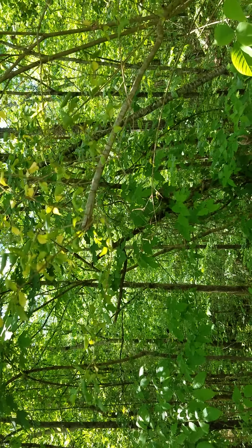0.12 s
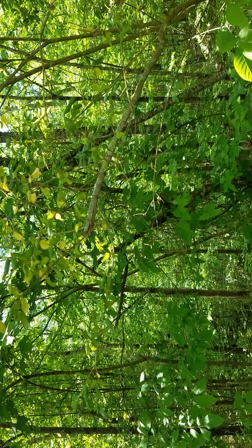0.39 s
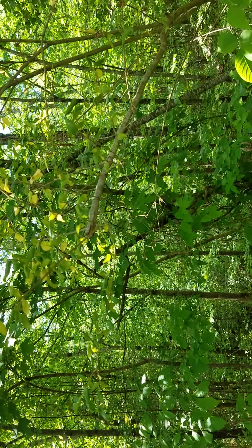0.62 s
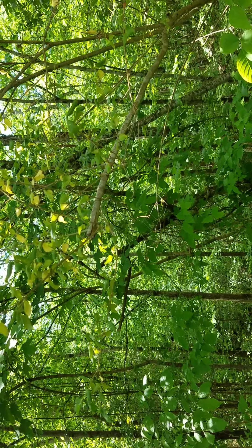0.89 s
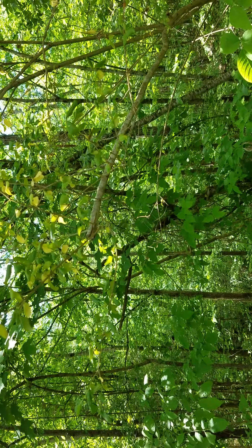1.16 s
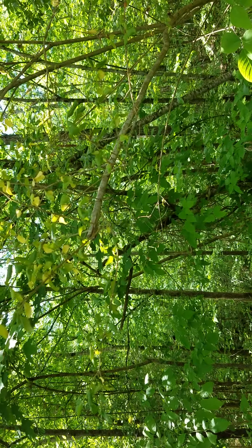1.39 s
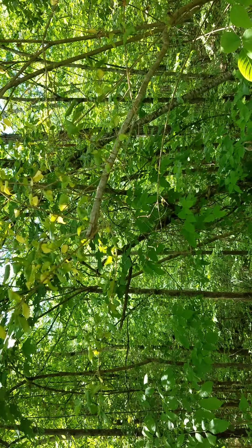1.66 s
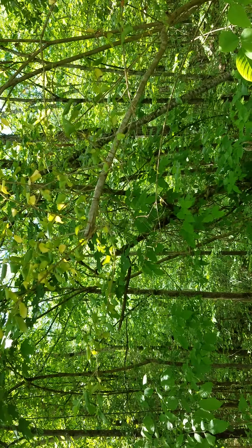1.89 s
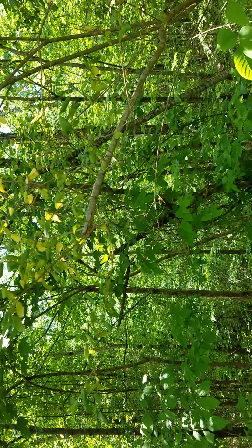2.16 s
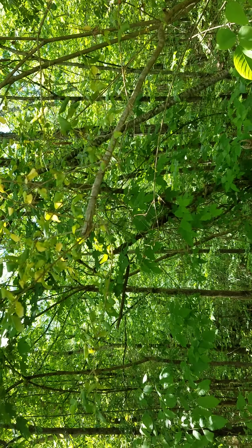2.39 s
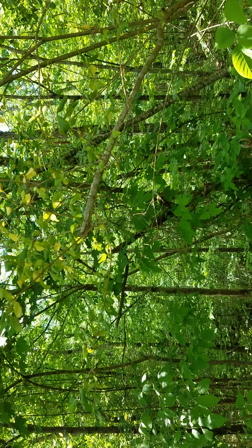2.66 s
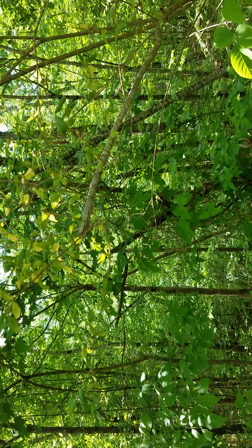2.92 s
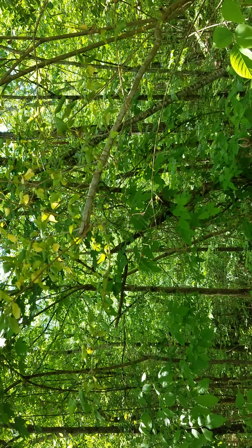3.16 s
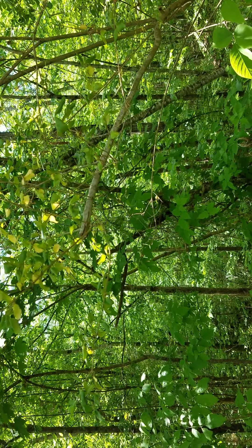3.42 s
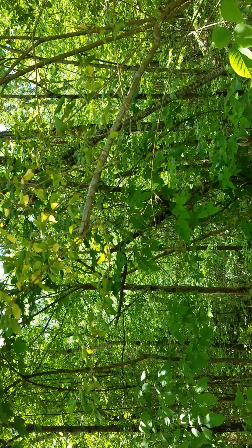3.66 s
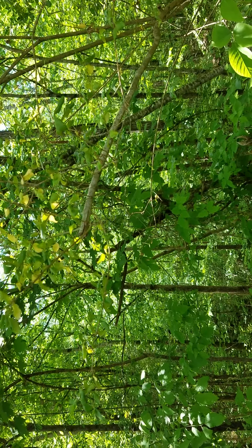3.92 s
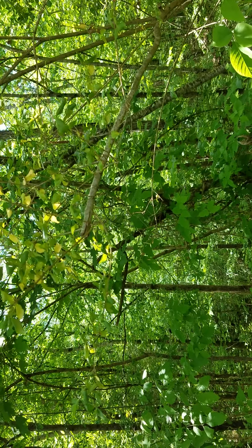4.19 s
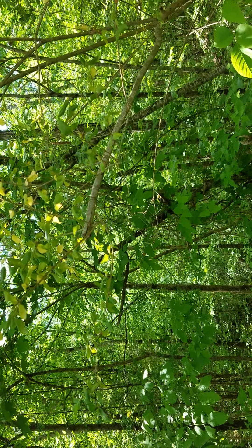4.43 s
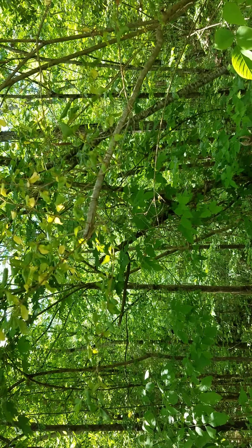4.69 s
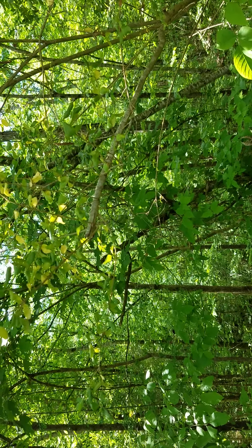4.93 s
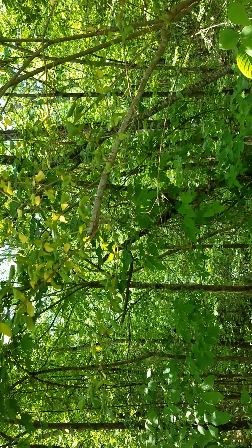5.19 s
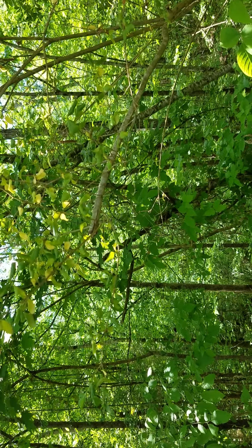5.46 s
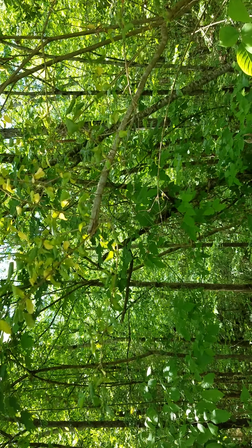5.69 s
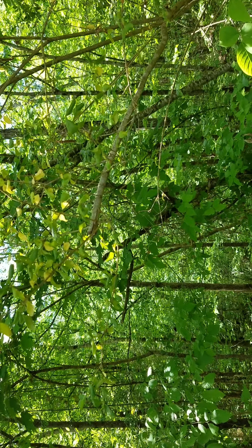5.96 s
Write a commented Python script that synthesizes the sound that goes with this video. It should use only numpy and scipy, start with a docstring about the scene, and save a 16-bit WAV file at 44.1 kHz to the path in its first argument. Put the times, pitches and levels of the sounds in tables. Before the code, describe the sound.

Outdoors among trees, open stereo microphones catch a continuous high sizzling buzz of countless cicadas, grainy and bright, rising over several seconds. Clear, mid-pitched bird whistles repeat through it in two bursts with a pause between, leaving a woodland echo. A very faint distant bird answers midway, near a soft low wind puff. A thin lower insect drone and quiet air sit far beneath.

```python
"""A swelling high buzz of hundreds of cicadas fills a summer wood, over a thin low drone from a farther kind.
A bird repeats two whistled phrases that echo among the trunks, and a second bird answers far off.
Below lies a faint rumble of air with a few wind puffs; dry ticks sound near the end. Two ports set apart hear it all.
The buzz is made of single clicks, the drone and rumble of shaped noise, the birds of gliding sines,
the puffs of brief low waves and the ticks of short bursts of treble noise."""
import sys
import numpy as np
from scipy import signal
from scipy.io import wavfile
from scipy.ndimage import uniform_filter1d

SR = 44100
rng = np.random.default_rng(int(sys.argv[2]) if len(sys.argv) > 2 else 0)


def wrap_up_sound(samples):
    """Save the sound to the file named by the first command line argument, as 16-bit audio."""
    columns = np.atleast_2d(samples).T
    # keep every value between -1 and 1, then stretch to whole-number steps
    tamed = np.clip(columns, -1, 1)
    steps = np.round(tamed * 32767).astype(np.int16)
    wavfile.write(sys.argv[1], SR, steps)


def level_to_linear(level):
    """Convert decibel levels to linear amplitude factors, elementwise."""
    exponent = np.asarray(level, float) / 20
    return 10 ** exponent


N = 268216  # length of the scene in samples

# the whole chorus swells and sinks: (t/s, level/dB)
CHORUS_SWELL = [(0.0, -30), (.6, -30.5), (.92, -28), (1.22, -30), (1.7, -28.5), (2.2, -28), (2.8, -27.5),
                (3.15, -26.5), (3.4, -26.5), (3.65, -24.5), (4.05, -25), (4.6, -22.5), (5.0, -23.5),
                (5.3, -23), (5.6, -24), (6.08, -24.5)]


def evened(x):
    """Scales a sound to an rms of 1."""
    return x / np.sqrt(np.mean(x ** 2) + 1e-20)


def read(points, hz, column=1):
    """Reads a table between its points on a log-frequency axis."""
    table = np.array(points, float)
    return np.interp(np.log(hz + 1), np.log(table[:, 0] + 1), table[:, column])


def curve(rows, t, column=1):
    """Reads a table between its points on the time axis."""
    table = np.array(rows, float)
    return np.interp(t, table[:, 0], table[:, column])


def swell_offset(t):
    """How far the chorus stands above its mean level, in dB."""
    level = curve(CHORUS_SWELL, t)
    return level - level.mean()


def left_right(db):
    """Gains of the two ports for a left-minus-right difference in dB."""
    return level_to_linear(np.array([[db], [-db]]) / 2)


def resonate(x, hz, width):
    """A resonance of gain 1 at its centre, applied twice for steep skirts."""
    turn = np.exp(2j * np.pi * hz * np.arange(x.shape[-1]) / SR)
    r = np.exp(-np.pi * width / SR)
    # turn the centre down to 0 Hz, smooth there, and turn it back up
    smooth = signal.lfilter([(1 - r) ** 2], [1, -2 * r, r * r], x / turn)
    return 2 * (turn * smooth).real


def scatter(t60, size):
    """Echoes off trunks and leaves: dense random taps that fall 60 dB in t60 seconds, others at each port."""
    fade = level_to_linear(-60 * np.arange(size) / SR / t60)
    tail = rng.standard_normal((2, size)) * fade
    return tail / np.linalg.norm(tail, axis=1, keepdims=True)


def pair(size):
    """Noise spectra for two ports, alike in the bass and mostly unrelated higher up."""
    # how alike left and right are: (f/Hz, likeness from -1 to 1)
    likeness = [(60, 0.69), (99, 0.7), (160, 0.78), (270, 0.76), (450, 0.58), (740, 0.06), (1220, -0.21),
                (2010, 0.03), (3330, 0.01), (5500, -0.01), (9080, 0.0), (15000, 0.01)]
    hz = np.fft.rfftfreq(size, 1 / SR)
    frames = 4 * N // size + 5  # more than enough; the excess is cut off later
    a, b, c, d = rng.standard_normal((frames, len(hz), 4)).T
    same = np.clip(read(likeness, hz), -1, 1)[:, None]
    left = a + 1j * b
    right = same * left + np.sqrt(1 - same ** 2) * (c + 1j * d)
    t = np.arange(frames) * size / 2 / SR  # frames overlap by half
    return hz, t, np.array([left, right])


def air(level_db=-56.5, gust_hz=300):
    """Moving air as a steady low noise; light wind changes the bass, mostly below gust_hz."""
    # colour of the rumble, relative: (f/Hz, level per Hz/dB)
    air_colour = [(12, -40), (20, -0.5), (64, -3), (146, -5.5), (184, -8.5), (357, -11.5), (809, -16.5),
                  (1080, -14), (1290, -11.5), (1420, -20), (2100, -23.5), (2730, -38), (4620, -120)]
    # rise and fall of the bass, relative, played at half speed: (t/s in the table, level/dB)
    gusts = [(0.0, -62.5), (.6, -61.5), (2.5, -61), (3.3, -60), (4.2, -57.5), (6.08, -56)]
    hz, t, z = pair(size=2048)
    gust = curve(gusts, t / 2)
    bass_share = 1 / (1 + (hz[:, None] / gust_hz) ** 4)
    field = read(air_colour, hz)[:, None] + (gust - gust.mean()) * bass_share
    wash = signal.istft(z * level_to_linear(field), SR, nperseg=2048)[1][:, :N]
    return level_to_linear(level_db) * wash / np.sqrt(np.mean(wash.mean(0) ** 2))


def puffs():
    """Each wind puff is a brief swing of pressure under a bell curve, stronger at one port."""
    # (t/s, level before the bell/dB, f/Hz, left minus right/dB)
    puff_list = [(3.188, -49, 149, 16), (3.217, -53, 130, -4), (3.239, -45, 190, 19),
                 (3.249, -46.5, 109, -12)]
    t = np.arange(N) / SR
    out = np.zeros((2, N))
    for s, db, hz, pan_db in puff_list:
        bell = np.exp(-(2.2 * hz * (t - s)) ** 2)
        swing = np.sin(2 * np.pi * hz * (t - s))
        out += level_to_linear(db) * left_right(pan_db) * bell * swing
    return out


def ticks(low_hz=12000, t60=.012, pan_db=8):
    """Dry ticks, louder on the left: snaps of noise that die away fast, with only the treble kept."""
    # (t/s, starting level before the treble filter/dB)
    tick_list = [(5.9, -52), (5.916, -55), (5.926, -51), (5.954, -56), (5.965, -52)]
    out, t = np.zeros(N), np.arange(600) / SR
    for s, db in tick_list:
        snap = rng.standard_normal(len(t))
        out[round(s * SR):][:len(t)] += level_to_linear(db - 60 * t / t60) * snap
    treble = signal.butter(4, low_hz, "high", fs=SR, output="sos")
    return signal.sosfilt(treble, out) * left_right(pan_db)


def drone(level_db=-64, follows=0.23, throb_db=1.5, throb_s=0.024):
    """Far singers blur into noise in their low body resonance, fluttering as voices come and go."""
    # body resonances: (f/Hz, width of one pass/Hz, gain/dB)
    resonances = [(1312, 110, 1.5), (1260, 200, -5)]
    _, _, z = pair(size=1024)
    hiss = signal.istft(z, SR, nperseg=1024)[1][:, :N]
    body = sum(level_to_linear(db) * resonate(hiss, f, width) for f, width, db in resonances)
    flutter = evened(uniform_filter1d(rng.standard_normal((2, N)), round(throb_s * SR), axis=1))
    body = body * level_to_linear(throb_db * uniform_filter1d(flutter, size=300, axis=1))
    body = body / np.sqrt(np.mean(body.mean(0) ** 2))
    # the far singers follow a share of the chorus swell
    return body * level_to_linear(level_db + follows * swell_offset(np.arange(N) / SR))


def bird(near_db=-8, near_t60=.15, echo_db=-1, echo_t60=1.1, gap_s=.02, leafy_hz=2250,
         lead_s=.0003, waver=.008):
    """Near-sine whistles; close branches break them up and the trunks echo them long."""
    # note shapes, each starting with the columns: (t from start/s, f/Hz, level/dB)
    DIP = [(0, 2820, -18), (.015, 2810, -8), (.055, 2780, -10), (.095, 2712, 1), (.125, 2720, -10),
           (.145, 2900, -9), (.158, 2680, -1), (.18, 2370, 4), (.215, 1870, -7), (.27, 2750, -10)]  # sinks, then leaps up at the end
    SLIP = [(0, 3550, -12), (.008, 3400, 0), (.028, 2900, 0), (.036, 2800, -14)]  # a quick fall over the start of a dip
    HOLD = [(0, 2380, -14), (.006, 2385, -2), (.016, 2200, -7), (.034, 2380, 0), (.06, 2425, -1),
            (.1, 2420, -1), (.137, 2408, 1), (.155, 2380, -22)]  # a nearly level note
    DROP = [(0, 2160, -18), (.008, 2075, -3), (.02, 2050, 0), (.035, 2044, -5), (.05, 2040, -24)]  # a short note that sinks slightly
    FAR = [(0, 3050, -3, 0), (.03, 2900, 3, 0), (.08, 2620, 0, -3), (.1, 2550, -14, -3),
           (.14, 2470, -3, -3), (.22, 2450, -2, -3), (.24, 2440, -16, -3)]  # a second, distant bird
    # how each shape is sung: (shape, echo send/dB, notes); notes: (start/s, level/dB, pitch factor)
    song = [(DIP, 4, [(-.015, -52, 1.003), (1.04, -49.5, 1.001), (3.322, -53.5, .998), (4.34, -50.5, 1.)]),
            (SLIP, 6, [(.02, -60, 1.), (1.075, -57, 1.), (3.375, -62, 1.), (4.375, -61, 1.)]),
            (HOLD, -2.5, [(.575, -47, 1.005), (1.65, -45.5, .991), (3.868, -47, 1.008),
            (4.905, -46, 1.003)]), (DROP, -2.5, [(.724, -46, 1.007), (1.79, -43.5, 1.), (4.008, -45, .998),
            (5.052, -44, .997)]), (FAR, 3, [(3.11, -65, 1.)])]
    lead = 2000  # spare samples ahead, so that a note can start before zero
    direct, voice = np.zeros((2, N + lead)), np.zeros((1, N + lead))
    for shape, wood_db, notes in song:
        t = np.arange(0, shape[-1][0], 1 / SR)
        hz, db = curve(shape, t), curve(shape, t, column=2)
        # high notes are louder on the left, low notes on the right: 15 dB per kHz around 2500 Hz
        pan_db = 15 * (hz - 2500) / 1000
        pan = level_to_linear(np.array([pan_db, -pan_db]) / 2)
        for s, note_db, factor in notes:
            shake = evened(uniform_filter1d(rng.standard_normal(len(t)), size=500))
            turns = np.cumsum(hz * factor * (1 + waver * shake)) / SR  # the pitch wavers a little
            level = np.sqrt(2) * level_to_linear(note_db + db) * signal.windows.tukey(len(t), .05)
            port_turns = np.array([turns + hz * factor * lead_s, turns])  # the left wave runs ahead
            at = round(s * SR) + lead
            direct[:, at:at + len(t)] += level * np.sin(2 * np.pi * port_turns) * pan
            voice[:, at:at + len(t)] += level_to_linear(wood_db) * level * np.sin(2 * np.pi * turns)
    near = level_to_linear(near_db) * np.pad(scatter(near_t60, size=10000), ((0, 0), (100, 0)))
    far = level_to_linear(echo_db) * np.pad(scatter(echo_t60, size=40000), ((0, 0), (round(gap_s * SR), 0)))
    # leaves return highs best
    far = signal.sosfilt(signal.butter(5, leafy_hz, "high", fs=SR, output="sos"), far)
    echo = sum(signal.fftconvolve(voice, tail, axes=1)[:, :N + lead] for tail in (near, far))
    return (direct + echo)[:, lead:]


def tymbals(spread=.07, jitter=.06, near_db=4.5, swell_db=2.5, swells_per_s=(.4, 6), leaf_t60=0.045):
    """Singers buckle their tymbals, each at its own rate and swell; clumps of trees smear the clicks."""
    singers, clumps = 480, 40
    clicks_per_s = 240  # middle rate of one singer
    count = round(1.5 * clicks_per_s * N / SR)
    rate, start, size, slow, phase = rng.random((singers, 5)).T[:, :, None]
    own_rate = 1 + spread * 2 * (2 * rate - 1)
    gaps = (1 + jitter * rng.standard_normal((singers, count))) / own_rate
    t = (np.cumsum(gaps, 1) + start) / clicks_per_s - .1  # already singing at the start
    swell_hz = np.geomspace(*swells_per_s, 101)[(100 * slow).astype(int)]
    own_swell = np.sin(2 * np.pi * (swell_hz * t + phase))
    force = level_to_linear(-near_db * np.log(size + 0.011) + swell_db * own_swell)  # a few singers stand out
    lead, out = 4410, np.zeros((2, N))
    for k in range(clumps):
        at = np.round(t[k::clumps] * SR).astype(int).ravel() + lead
        clicks = np.bincount(at, force[k::clumps].ravel())[:N + lead]
        port = k % 2  # a clump is heard at the port that faces it
        smeared = signal.oaconvolve(clicks, scatter(leaf_t60, size=4000)[port])
        out[port] += smeared[lead:N + lead]
    return out


def buzz():
    """The clicks ring through the insects' bodies and the ports; the whole wood swells together."""
    # colour of the buzz at each port, relative: (f/Hz, left/dB, right/dB)
    buzz_colour = [(1830, -51, -50), (2520, -39, -38), (3345, -31.5, -34.5), (3806, -22, -25),
                   (4150, -20, -21.5), (4896, -21.5, -19), (5432, -16, -6.5), (5894, -7.5, -0.15),
                   (6197, -13, -1), (6550, -11.5, -8.5), (6910, -13.5, -7.5), (7640, -17.5, -13),
                   (8420, -15.5, -22.5), (8955, -24, -29.5), (9760, -37, -37), (10950, -40.5, -45.5),
                   (12300, -47, -49.5), (13200, -51.5, -51), (14500, -59, -59), (15700, -59.8, -56)]
    # outer bands swell less than the core: (centre f/Hz, half width/Hz, share of the swell they follow)
    flanks = [(3900, 1800, 0.75), (8300, 940, 0.9), (11000, 1600, 0.77), (14600, 1800, 0.54)]
    # the top brightens once: (centre t/s, half length/s, centre f/Hz, half width/Hz, rise/dB)
    treble_rise = (2.9, .5, 12000, 980, 4)
    hz, t, z = signal.stft(tymbals(), SR, nperseg=512)
    # flatten the spectrum, then colour it
    z = z / np.sqrt((abs(z) ** 2).mean(2, keepdims=True))
    colour = np.array([read(buzz_colour, hz, column=1), read(buzz_colour, hz, column=2)])[:, :, None]
    colour = colour - 60 * (hz < 1800)[:, None]  # next to nothing below 1800 Hz
    z = z * level_to_linear(colour)
    z = z / np.sqrt(np.mean(signal.istft(z.mean(0), SR, nperseg=512)[1] ** 2))
    lag = sum((1 - share) * np.exp(-((hz - centre_hz) / half_hz) ** 4)
              for centre_hz, half_hz, share in flanks)
    field = curve(CHORUS_SWELL, t) - lag[:, None] * swell_offset(t)
    s, half_s, rise_hz, half_hz, db = treble_rise
    field = field + db * np.exp(-((t - s) / half_s) ** 2 - ((hz[:, None] - rise_hz) / half_hz) ** 2)
    return signal.istft(z * level_to_linear(field), SR, nperseg=512)[1][:, :N]


def scene():
    """All voices of the wood; the left port takes drone and air a little louder."""
    low_sounds = left_right(.8) * (air() + drone())
    return low_sounds + puffs() + ticks() + bird() + buzz()


def roll_off(x):
    """The treble ends steeply here."""
    return signal.sosfilt(signal.butter(12, 15700, fs=SR, output="sos"), x)


def record(dry):
    """Turns the finished mix into the sound that is stored."""
    return roll_off(dry)


dry = scene()
out = record(dry)
wrap_up_sound(out)
```